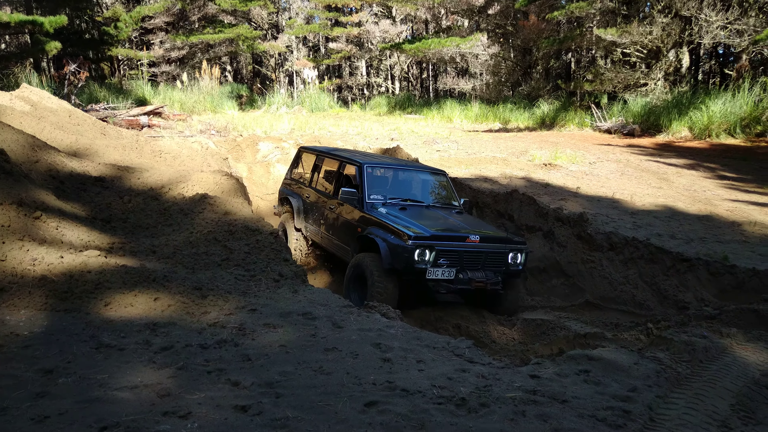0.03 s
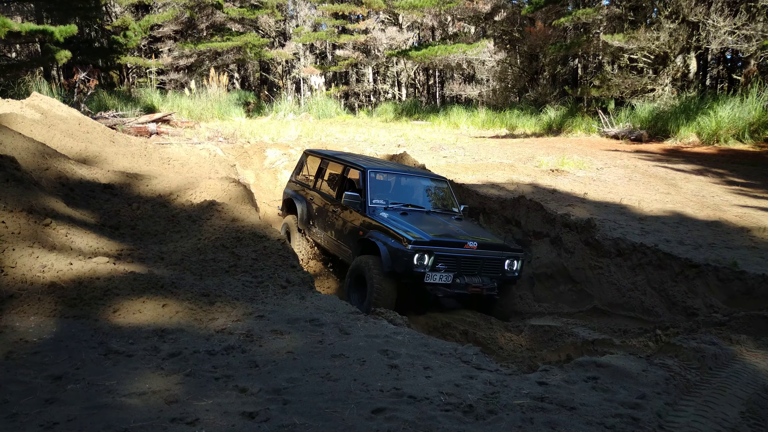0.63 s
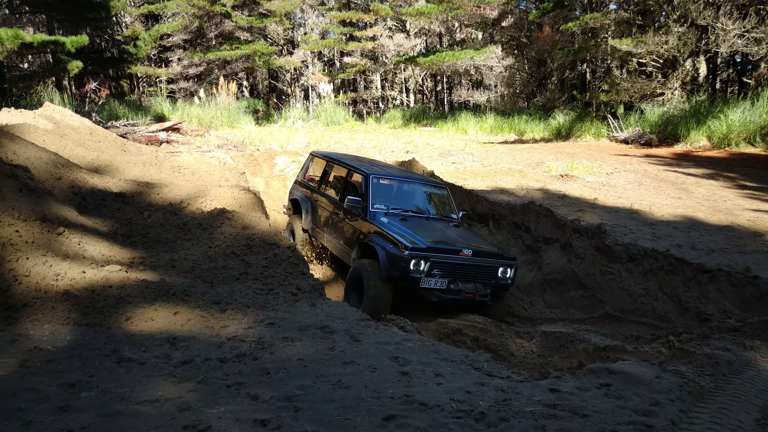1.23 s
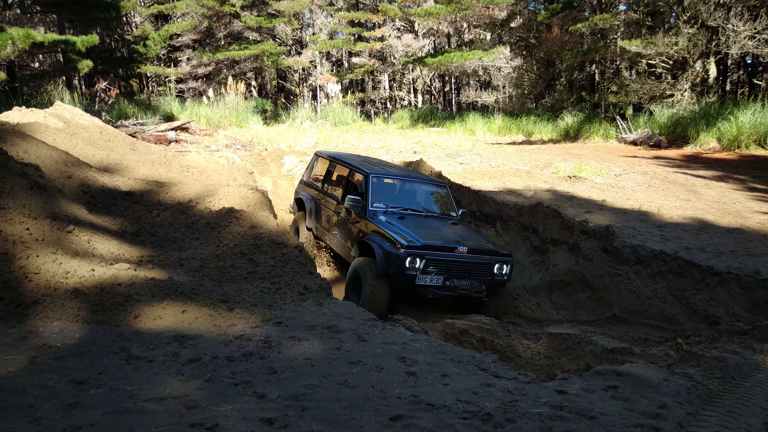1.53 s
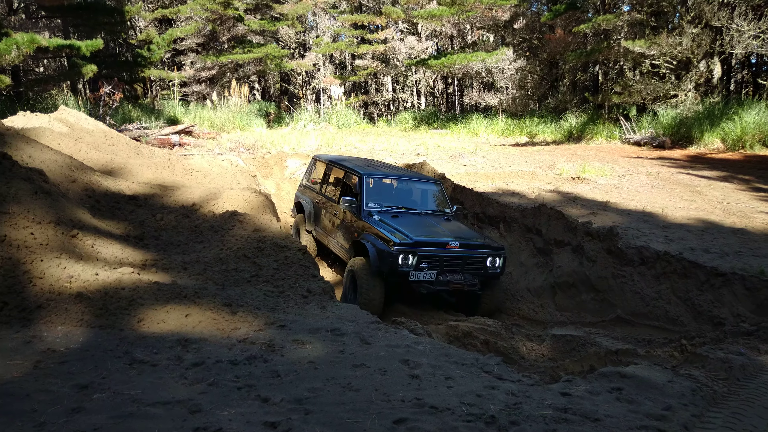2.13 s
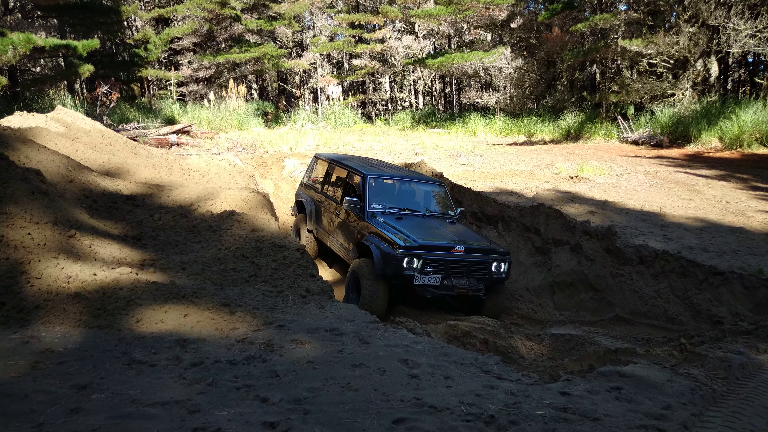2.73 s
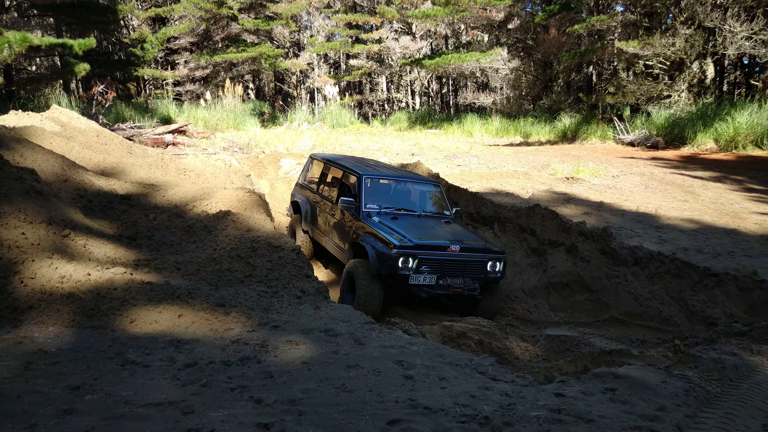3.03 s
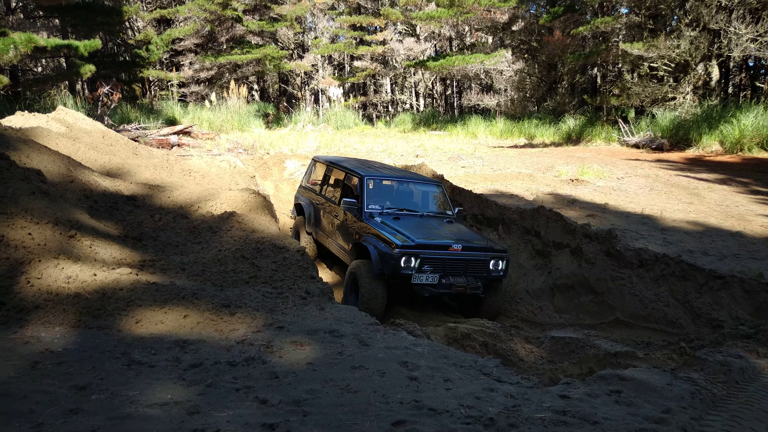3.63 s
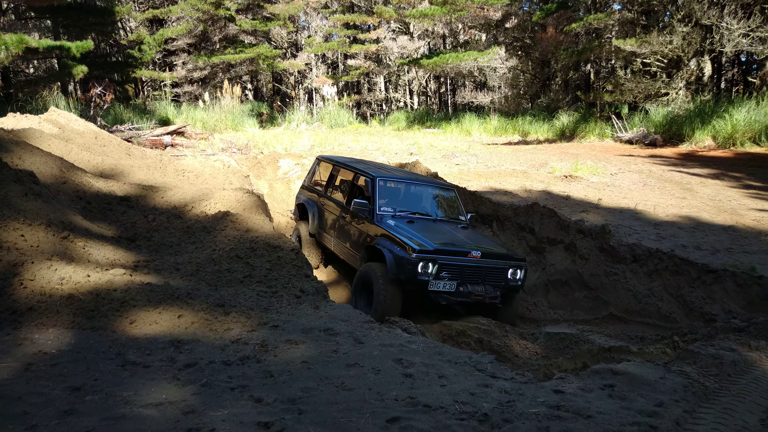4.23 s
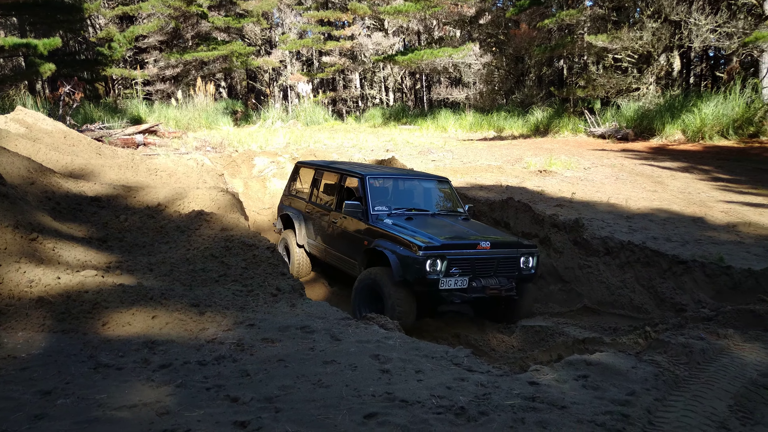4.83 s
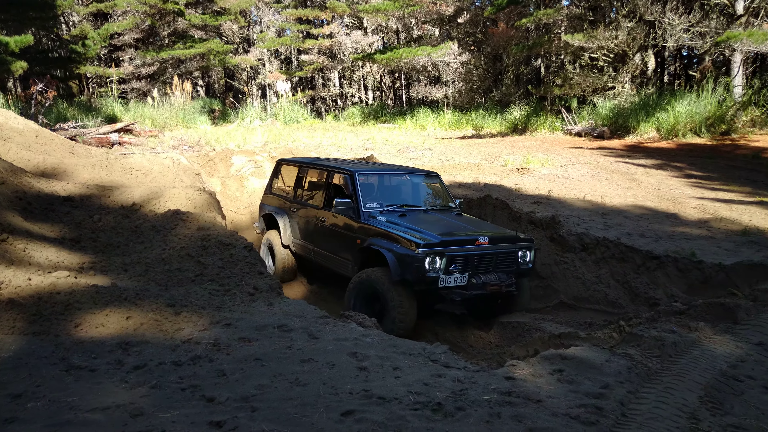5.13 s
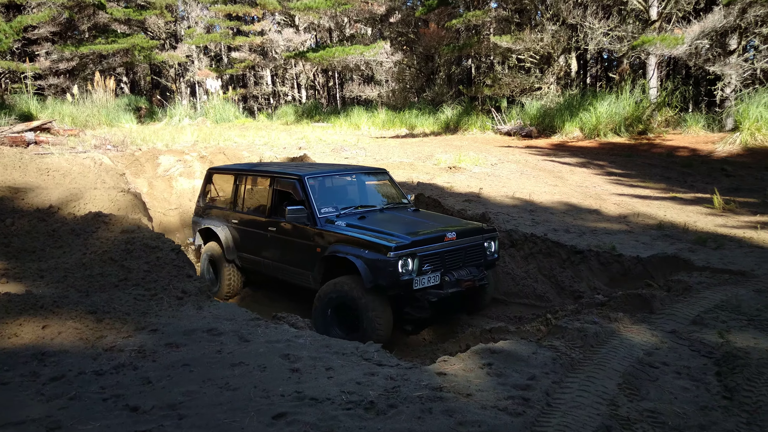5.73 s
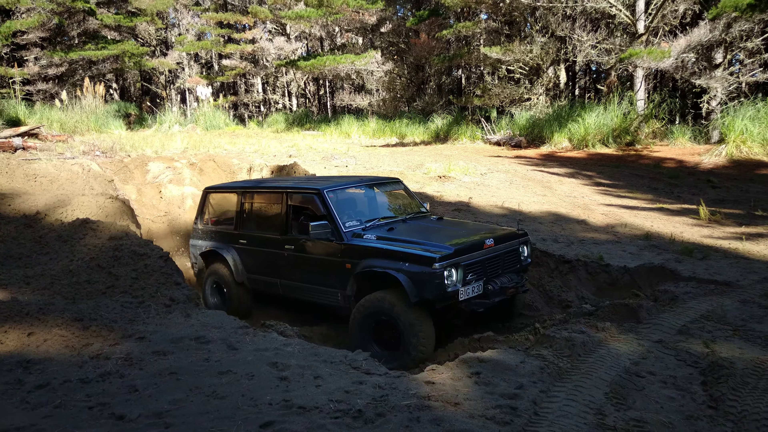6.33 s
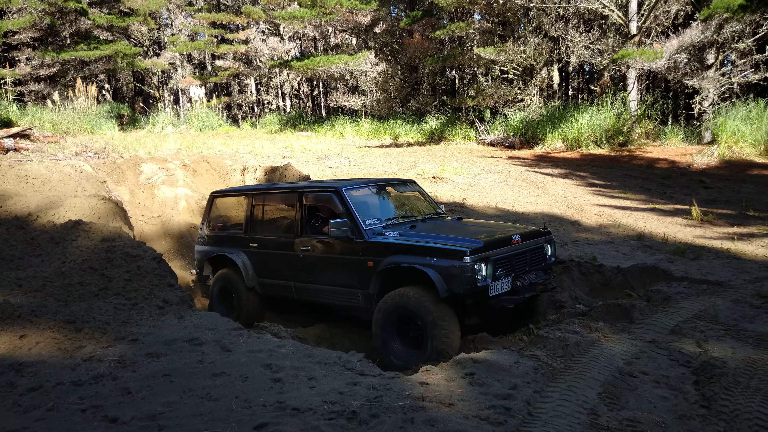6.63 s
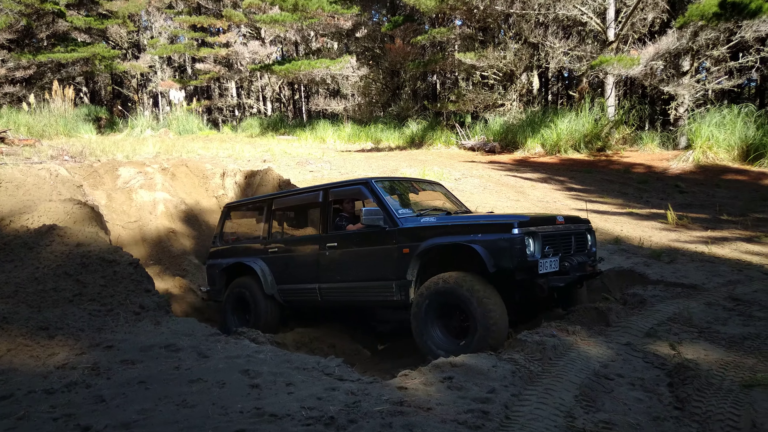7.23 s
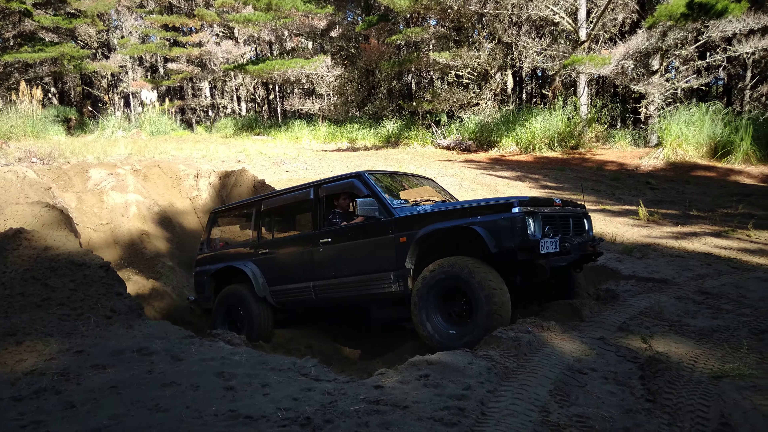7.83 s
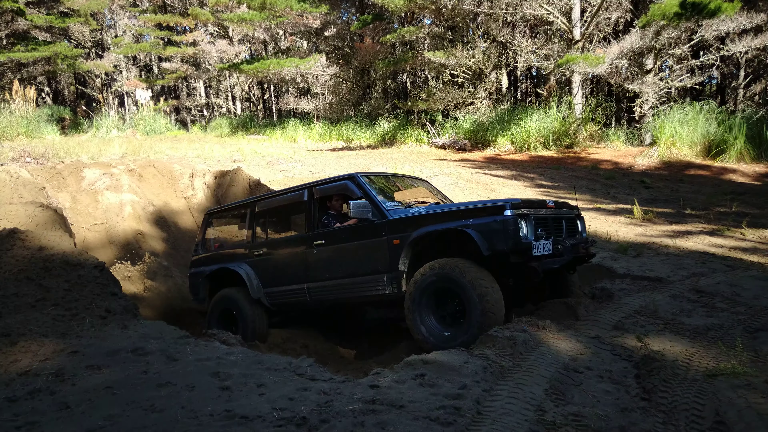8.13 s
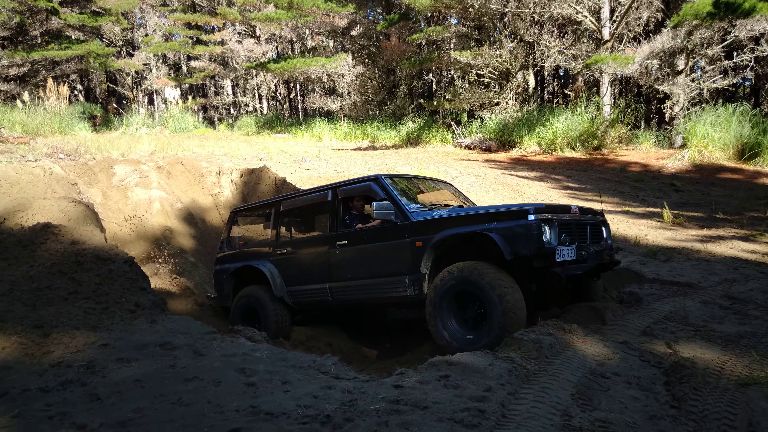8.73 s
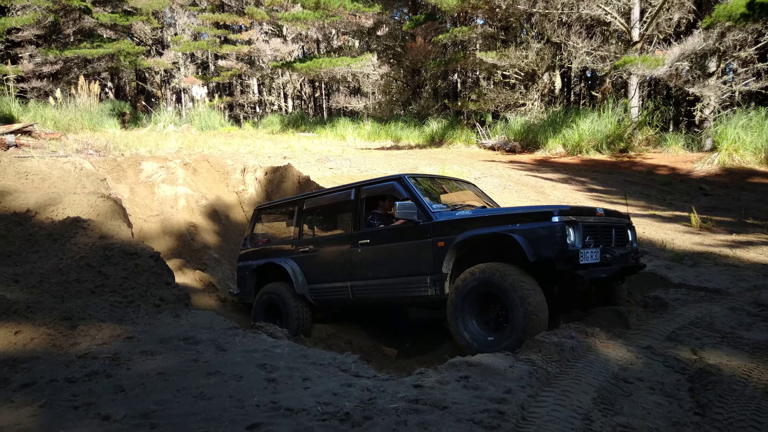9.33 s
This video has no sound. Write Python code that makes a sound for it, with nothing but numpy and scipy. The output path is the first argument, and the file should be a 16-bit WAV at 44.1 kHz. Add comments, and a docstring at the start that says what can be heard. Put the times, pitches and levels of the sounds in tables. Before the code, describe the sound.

A four-wheel drive's turbo-diesel rumbles and clatters at low revs, nearly stalling before it picks up again. It then revs hard, with a booming exhaust, a rising turbo whistle and a rasping intake howl. The throttle lifts, the chassis clanks and thumps, and the turbo flutters as it winds down. It is heard in stereo from some metres away in a forest, with faint insect hiss behind.

```python
"""A sand hollow in a pine forest; some metres from a stereo microphone a four-wheel drive crawls out.
Its six-cylinder turbo-diesel lugs and nearly stalls, then revs hard: exhaust pulses boom in the pipe,
combustion rings in the block, the turbo whistles up, the intake ducts howl and jolts knock the chassis.
Off the throttle the compressor flutters and winds down. Far off, insects hiss in the trees."""
import sys
import numpy as np
from scipy import signal
from scipy.fft import rfft, irfft, next_fast_len
from scipy.io import wavfile
from scipy.ndimage import uniform_filter1d, map_coordinates

SR = 44100
rng = np.random.default_rng(int(sys.argv[2]) if len(sys.argv) > 2 else 0)


def materialize(psi):
    """Save the field psi as 16-bit PCM at rate SR to the path in sys.argv[1].

    A 1-D psi becomes a single channel; in a 2-D psi each row is a channel.
    """
    bounded = np.clip(np.atleast_2d(psi).T, -1, 1)
    quanta = np.round(bounded * 32767).astype(np.int16)
    wavfile.write(sys.argv[1], SR, quanta)


N = 422037
TIME = np.arange(N) / SR
MIDDLE_RATE, LUG_RATE = 100, 50.4  # firings per second: mid revs, and labouring near a stall

# the foot comes off the throttle: (time [s], half-width [s], drop of the exhaust pulses [dB])
THROTTLE_LIFTS = [(2.66,.145,24),(3.14,.07,13),(7.47,.145,7.5)]
def engine(turn, rate):
    """Exhaust and block, some metres off: louder with speed, softer when the throttle lifts."""
    lift_db = swells(THROTTLE_LIFTS)
    clutch_db = 9.5 * swell(2.91, 0.5)  # with the clutch down the engine runs free and quieter
    rumble_db = -41.5 + 8.5 * np.log2(rate / MIDDLE_RATE) - 0.68 * lift_db - clutch_db
    knock_octaves = np.log2(np.maximum(rate, LUG_RATE) / MIDDLE_RATE)
    clatter_db = -35.1 + 11.5 * knock_octaves - 0.4 * lift_db - clutch_db
    angle = 2 * np.pi * turn
    tones = exhaust_boom(angle, rate, lift_db) + exhaust_bark(angle)
    tones += exhaust_growl(angle, rate, rumble_db + clutch_db / 2)
    rumble = from_db(rumble_db) * exhaust_rumble(turn, rate)
    return np.sqrt(2) * tones + rumble + block_clatter(turn, rate, clatter_db)


# exhaust pulses before the pipe colours them: (time [s], level [dB])
EXHAUST_PULSES = [(0.0, -16.5), (1.47, -19), (1.71, -8), (2.22, -8.5), (3.11, -37), (3.23, -20),
                  (3.96, -20.5), (4.59, -16.5), (5.57, -21), (5.76, -34), (6.5, -29), (6.85, -17),
                  (6.905, 0), (7.26, -0.5), (7.34, -9), (7.63, -9), (7.79, -3.5), (7.87, -11.5),
                  (8.17, -6.5), (8.32, -17.5), (8.38, -18), (9.57, -26.5)]
# pipe resonances that the firing tone and its octave pass through: (frequency [Hz], gain [dB])
PIPE_RESONANCES = [(42,-37),(58,-21),(72,-8),(83,-4.5),(105,-4.5),(125,-12),(150,-22),(180,-19.5),(240,-20),(330,-64),(430,-42)]
# the exhaust note stumbles: (time [s], half-width [s], dip [1 halves the tone], low thud [dB])
EXHAUST_STUMBLES = [(3.436,0.012,1,-27),(3.621,0.041,1,-28),(8.372,0.02,1,-21),(8.515,0.022,1,-23)]
def exhaust_boom(angle, rate, lift_db):
    """The pipe booms and wavers at the firing rate and its octave; the recorder adds a mirror tone."""
    pulse_db = in_time(EXHAUST_PULSES)[0] - lift_db
    tone_db = pulse_db + at_hz(PIPE_RESONANCES, rate)
    octave_db = pulse_db - 10.5 + at_hz(PIPE_RESONANCES, 2 * rate)
    dip = sum(depth * swell(s, width) for s, width, depth, _ in EXHAUST_STUMBLES)
    thud = sum(from_db(db) * swell(s, width) for s, width, _, db in EXHAUST_STUMBLES)
    slow, overrun = np.clip((75 - rate) / 15, 0, 1), swell(8.2, .9)
    waver_db = .7 + .3 * slow + 1.9 * overrun
    boom = (2 - dip) * from_db(tone_db + waver_db * drift(50)) * np.sin(angle)
    boom += from_db(octave_db + .7 * drift(22)) * np.sin(2 * angle + 0.12 * drift(18))
    boom += thud * np.sin(.6 * angle)
    return boom + recorder_mirror_tone(angle, rate, tone_db)


# bark at twice the firing rate as boost builds: (time [s], level [dB])
BOOST_BARK = [(5.4,-62),(5.8,-41),(6.2,-33),(6.55,-35.5),(6.68,-54),(6.85,-31.5),(7.0,-42),(7.3,-57),(7.4,-64)]
# light dabs of throttle: (time [s], half-width [s], order [x firing rate], level [dB])
THROTTLE_DABS = [(2.9,.09,2,-34.5),(3.01,.08,4,-38.5)]
def exhaust_bark(angle):
    """Under boost the pipe barks and unequal cylinders add undertones; a throttle dab sounds one order."""
    bark = from_db(in_time(BOOST_BARK)[0] + 2 * drift(25)) * np.sin(2 * angle + .3 * drift(25))
    undertones = np.sin(angle * 2 / 3) + .22 * np.sin(angle / 3)
    undertones *= from_db(in_time(BOOST_LEVEL)[0] - 19 + 2 * drift(30))
    dabs = sum(from_db(db) * swell(s, width) * np.sin(order * angle)
               for s, width, order, db in THROTTLE_DABS)
    return bark + undertones + dabs


# higher exhaust orders: (order [x firing rate], relative level [dB], share of silencer gain [0-1])
EXHAUST_ORDERS = [(1.5,-5,0.32),(2,-1.5,0.33),(2.5,-6,0.83),(3,-2,0.6),(3.5,-26.5,0.54),(4,-7,0.69),(5,-3.5,0.79)]
# response of the silencer: (frequency [Hz], gain [dB])
SILENCER_RESPONSE = [(80,13),(140,-4.5),(175,13.5),(210,-0.5),(240,5),(262,8),(295,-10),(345,-10),(410,-29.5),(620,-14),(1200,-20)]
# the engine takes up load: (time [s], half-width [s], rise [dB])
LOAD_PUSHES = [(1.05,.4,5),(3.38,.12,4),(8.15,.2,3),(5.36,.2,8),(8.65,.3,4)]
def exhaust_growl(angle, rate, base_db):
    """Higher orders sweep through the silencer's resonances and swell under load."""
    loaded_db = base_db + swells(LOAD_PUSHES)
    growl = 0
    for order, db, share in EXHAUST_ORDERS:
        level_db = loaded_db + db + share * at_hz(SILENCER_RESPONSE, order * rate) + 2.4 * drift(14)
        growl += from_db(level_db) * np.cos(order * angle + 0.25 * drift(12))
    return growl


# rough gas noise from the pipe: (frequency [Hz], level [dB])
PIPE_SPECTRUM = [(30,-42),(60,-31),(110,-15),(165,0),(210,-1.5),(260,0),(335,-3),(410,-18),(600,-19.5),(1200,-40.5)]
# the engine shaking on its mounts: (frequency [Hz], level [dB])
SHUDDER_SPECTRUM = [(20,-9),(45,-8),(90,1),(150,-2),(260,-26),(600,-67)]
def exhaust_rumble(turn, rate):
    """Uneven firings and noise rumble in the pipe; a slow engine shudders on its mounts."""
    rough = from_db(-1.5) * firings(turn, rate, ring_s=0.025, uneven_db=2.5) + from_db(3) * white()
    shake = from_db(2.5) * (60 / np.maximum(rate, LUG_RATE)) ** 2.7
    return radiate(rough, PIPE_SPECTRUM) + shake * radiate(white(), SHUDDER_SPECTRUM)


# ring of the engine block: (frequency [Hz], level [dB])
BLOCK_SPECTRUM = [(200,-35.5),(410,-12),(550,2.5),(800,6.5),(1000,-4),(1150,-9),(1500,-3.5),(1830,-12.5),(2200,-3),(2600,-18.5),(4000,-23),(6300,-16.5),(8500,-65),(15000,-49)]
# the labouring engine knocks harder: (time [s], half-width [s], rise [dB])
HARD_KNOCKS = [(.2,0.38,1),(1.9,0.026,6),(2.02,.015,3),(2.125,0.01,8),(2.235,0.021,6.5),(5.2,.45,2)]
def block_clatter(turn, rate, level_db):
    """Combustion knock and a noise that throbs with it ring in the engine block."""
    knock_share = np.clip(0.23 * rate / 150, 0, .8)
    knock = firings(turn, rate, ring_s=0.011, uneven_db=2.0)
    throb = rms_one(from_db(0.33 * np.cos(2 * np.pi * turn) + 0.85 * drift(30)))
    force = np.sqrt(knock_share) * knock + np.sqrt(1 - knock_share) * throb * white()
    block = radiate(force, BLOCK_SPECTRUM)
    # fast combustion hardens the knock, so the block's low ring recedes
    hardness = np.clip(0.43 * np.log2(rate / 91), 0, .7)
    block -= hardness * resonate(block, hz=630, width_hz=420)
    return from_db(level_db + swells(HARD_KNOCKS)) * block


# loudness of the intake as boost builds and drops: (time [s], level [dB])
BOOST_LEVEL = [(5.6,-90),(6.3,-45),(6.62,-29),(6.76,-20.5),(6.88,-13.8),(7.07,-13.5),(7.17,-15.5),(7.285,-14.5),(7.335,-40),(8.1,-53),(8.8,-100)]
# intake duct resonances: (frequency [Hz], nominal width [Hz], gain [dB])
INTAKE_DUCTS = [(560,110,-15),(745,140,-3),(890,140,-4),(1100,80,-10),(1410,60,-3),(1555,100,0),(2085,60,-7),(2265,70,4),(2340,60,-3),(2420,70,-1.5),(2780,50,-8),(2990,130,-11)]
def intake_howl(turn, rate):
    """Under boost the gulps of the cylinders ring in the intake ducts, each duct swelling on its own."""
    gulps = firings(turn, rate, ring_s=.005, uneven_db=1.7) + .15 * white()
    ducts = 0
    for hz, width, db in INTAKE_DUCTS:
        ring = resonate(resonate(gulps, hz, 2 * width), hz, 2 * width)
        ducts += from_db(db + 1.6 * drift(7)) * ring
    mid, side = rms_one(ducts)
    howl = mid + 0.3 * side * np.array([[1], [-1]])
    return from_db(in_time(BOOST_LEVEL)[0] - 5.5) * howl


# rasp of the intake: (frequency [Hz], level [dB])
RASP_SPECTRUM = [(100,-30),(400,10),(900,-10),(1600,-12),(2500,-2),(3000,0.5),(3500,13.5),(4150,1),(5000,11),(5800,12.5),(8500,2),(11000,-2),(15500,-1)]
# hiss of the charge air: (frequency [Hz], level [dB])
HISS_SPECTRUM = [(2500,-27),(4000,-21),(4600,1),(5900,6),(7300,0.5),(8500,-4.5),(10000,-8.5),(12000,-11.5),(14000,-3),(16000,-10)]
def intake_rush(turn, rate):
    """Near full boost each firing spits a sharp rasp and the charge air hisses in spurts."""
    boost_db, = in_time(BOOST_LEVEL)
    spits = firings(turn, rate, ring_s=0.004, uneven_db=2.0) * from_db(1.3 * drift(90))
    spurts = rms_one(from_db(1.2 * drift(40) + 3 * np.cos(2 * np.pi * turn)))
    rasp = from_db(-11) * radiate(spits, RASP_SPECTRUM)
    hiss = from_db(-13) * spurts * radiate(white(), HISS_SPECTRUM)
    rush_db = boost_db + .5 * (boost_db - boost_db.max())  # grows faster than the howl
    return from_db(rush_db) * (rasp + hiss)


# air through the compressor: (frequency [Hz], level [dB])
AIR_SPECTRUM = [(400,-54),(900,7.5),(1500,15),(2300,7),(3000,8),(4000,-4),(5200,8.5),(6800,14.5),(8500,1.5),(11500,-14),(14000,1),(16000,-11.5)]
# the flow swells and sags with the throttle: (time [s], half-width [s], change [dB])
AIR_GUSTS = [(6.6,0.11,-2),(7.4,0.11,-2),(7.675,0.022,2.5),(7.77,0.017,2),(7.88,.07,-1.5),(8.15,0.15,0.5),(9.3,0.18,-1)]
def compressor_air(turn, rate, turbo_hz, surge_db):
    """Air rushes through the compressor, louder with the revs, louder and brighter with turbo speed."""
    no_flow_hz, full_flow_hz = 2525, 11500  # whistle pitches between which the rush brightens
    grit = rms_one(from_db(0.91 * drift(56) + 0.72 * np.cos(2 * np.pi * turn)))
    bright = radiate(grit * white(), AIR_SPECTRUM)
    dull = signal.sosfilt(signal.butter(2, 7000, fs=SR, output="sos"), bright)
    flow = np.clip(np.log(turbo_hz / no_flow_hz) / np.log(full_flow_hz / no_flow_hz), 1e-6, 1) ** 0.38
    speed_db = -40.5 + 10 * np.log2(rate / MIDDLE_RATE) + 3 * np.log2(turbo_hz / 4000)
    approach_db = np.interp(TIME, [5.5, 8.5], [0, 2.5])  # the vehicle nears the microphone
    level_db = speed_db + approach_db + surge_db + swells(AIR_GUSTS)
    return from_db(level_db) * (flow * bright + (1 - flow) * dull)


def compressor_surge():
    """Off the throttle the compressor surges in a quickening run of chuffs; gives the swing in dB."""
    start_s, first_gap_s, quicken_s = 8.102, .0675, .0012
    chuff = np.arange(20)
    times = start_s + chuff * first_gap_s - chuff ** 2 * quicken_s / 2
    surge_db = 6 * sum(swell(s, 0.017) for s in times)
    return surge_db - uniform_filter1d(surge_db, size=SR // 8)


# the turbo's whistle: (time [s], level [dB])
WHISTLE_LEVEL = [(5.2,-85),(5.7,-61),(5.98,-51),(6.05,-33),(6.1,-39),(6.2,-32),(6.36,-27.5),(6.47,-39),(6.57,-39),(6.64,-32),(6.71,-38),(6.9,-37),(7.0,-47),(7.25,-45),(7.33,-53),(7.5,-49),(7.59,-38),(7.76,-47),(7.95,-37),(8.12,-29.5),(8.4,-45),(8.7,-54),(8.85,-68),(9.57,-80)]
# its octave, heard while the compressor takes up load: (time [s], level [dB])
WHISTLE_OCTAVE = [(4.2,-85),(4.55,-58),(5.3,-58),(5.55,-68),(5.95,-53),(6.42,-46),(6.5,-110)]
def turbo_whistle(hz, surge_db):
    """A breathy tone reaches each microphone side by shifting paths; chuffs shake pitch and level."""
    whistle_db = in_time(WHISTLE_LEVEL)[0] + .25 * surge_db
    bend = 1 + 0.0045 * drift(35) + .001 * surge_db
    angle = 2 * np.pi * np.cumsum(hz * bend) / SR
    octave = from_db(in_time(WHISTLE_OCTAVE)[0]) * np.sin(2 * angle)
    channels, shared_flicker = [], drift(25)
    for side in (1, -1):
        breath = drift(150) * np.sin(angle) + drift(150) * np.cos(angle)
        tone = rms_one(np.sin(angle + .6 * drift(30)) + .5 * breath)
        flicker_db = 2.24 * (shared_flicker + drift(50))
        level_db = whistle_db + side * at_hz(MIC_BALANCE, hz) / 2 + flicker_db
        channels.append(from_db(level_db) * tone + octave * (.7 + .5 * drift(60)))
    return np.array(channels)


# jolts of the suspension: (time [s], clank level [dB], low thump level [dB])
SUSPENSION_JOLTS = [(7.272,-17,-14),(7.312,-21,-25),(7.395,-44,-22),(7.665,-13,-19),(7.705,-18,-15),(7.752,-22,-17),(7.812,-29,-26),(7.993,-16,-14),(8.010,-14.5,-19),(8.076,-21.5,-20),(8.160,-21,-20),(8.186,-25,-28),(8.232,-22,-24),(8.303,-23,-23),(8.390,-27,-17),(8.432,-26,-30),(8.52,-28,-32)]
# modes of the chassis: (frequency [Hz], level [dB], time to fall 60 dB [s])
CHASSIS_MODES = [(98,-21,0.096),(152.6,-0.5,0.12),(288,-3,0.073),(342,-12,0.096),(517,-4.5,0.048),(573,-1.5,0.089),(671,-7,0.17),(830,-10,0.046),(974,-13,0.059),(1360,-18,0.3)]
def chassis_knocks():
    """Each jolt thumps the low chassis modes, clanks the high ones and scatters a short crunch."""
    clanks = [(s, db) for s, db, _ in SUSPENSION_JOLTS]
    thumps = [(s, db) for s, _, db in SUSPENSION_JOLTS]
    body = sum((-1) ** k * from_db(db) * struck(thumps if hz < 400 else clanks, hz, t60)
               for k, (hz, db, t60) in enumerate(CHASSIS_MODES))
    body = signal.sosfilt(signal.butter(2, 85, "high", fs=SR, output="sos"), body)
    crunch = radiate(bursts(clanks, t60=.09) * white(), BLOCK_SPECTRUM)
    return body + from_db(-9.5) * crunch


# sharp ticks from under the vehicle: (time [s], level [dB])
UNDERBODY_TICKS = [(.3595,-33),(.3635,-22.5),(1.699,-47)]
# modes of the part that ticks: (frequency [Hz], level [dB], time to fall 60 dB [s])
SMALL_PART_MODES = [(646,-4.5,.17),(824,-10,.08),(1384,-14.5,.09),(1523,-15.5,.1),(2200,-14.5,.19)]
# the click of each tick: (frequency [Hz], level [dB])
CLICK_SPECTRUM = [(100,-12),(300,-5),(680,6),(1200,-1),(1800,-6),(2350,0),(2800,-6),(3300,-1),(4100,-3),(4800,0),(6500,3),(7500,-3),(9000,-17),(15000,-30)]
def underbody_ticks():
    """A small part under the vehicle clicks and rings briefly."""
    ring = sum(from_db(db) * struck(UNDERBODY_TICKS, hz, t60) for hz, db, t60 in SMALL_PART_MODES)
    return ring + radiate(bursts(UNDERBODY_TICKS, t60=0.028) * white(), CLICK_SPECTRUM)


# the pine forest around the microphone: (frequency [Hz], level [dB])
FOREST_SPECTRUM = [(30,6.5),(130,12.5),(260,11.5),(410,-23),(560,9.5),(750,11),(1100,-49),(2100,4.5),(2700,-68),(4000,-38),(5200,-19),(6400,-1),(8500,-35),(15000,-22)]
def forest():
    """Far insects hiss in the trees over a steady low murmur."""
    return from_db(-47.0) * radiate(white(), FOREST_SPECTRUM)


def recorder_mirror_tone(angle, rate, tone_db):
    """At low revs a faint, very deep tone from the recorder mirrors the firing tone about 50 Hz."""
    low_revs = np.clip((100 - rate) / 25, 0, 1)
    return from_db(tone_db - 19) * low_revs * np.sin(2 * np.pi * 100 * TIME - angle)


# likeness of the microphone's two sides: (frequency [Hz], correlation [0-1])
MIC_LIKENESS = [(100,.999),(300,.98),(700,.93),(1300,.78),(2400,.78),(4500,.55),(8000,.45),(14000,.25)]
# balance at the microphone: (frequency [Hz], left minus right [dB])
MIC_BALANCE = [(100,.5),(350,-0.5),(700,-0.5),(1300,6.5),(2400,0.5),(5000,4),(9000,-3.5),(14000,4)]
def radiate(pair, spectrum):
    """Colour two unrelated signals by a spectrum's shape and spread them to left and right."""
    size = next_fast_len(N + SR // 10)
    hz = np.arange(size // 2 + 1) * SR / size
    mid, side = rfft(pair, size) * rms_one(from_db(at_hz(spectrum, hz)))
    alike, sign = at_hz(MIC_LIKENESS, hz), np.array([[1], [-1]])
    both = np.sqrt((1 + alike) / 2) * mid + sign * np.sqrt((1 - alike) / 2) * side
    return irfft(both * from_db(sign * at_hz(MIC_BALANCE, hz) / 2), size)[:, :N]


def firings(turn, rate, ring_s, uneven_db, cylinders=6):
    """Each cylinder strikes the structure by its own path, so the pattern repeats every engine cycle."""
    onsets = np.flatnonzero(np.diff(np.floor(turn)) > 0)
    force = from_db(uneven_db * rng.standard_normal(len(onsets))) / np.sqrt(rate[onsets])
    age, ringing = TIME[:SR // 20], 0
    for k in range(cylinders):
        blows = np.zeros((1, N))
        blows[0, onsets[k::cylinders]] = force[k::cylinders]
        path = rng.standard_normal((2, len(age))) * np.exp(-age / ring_s)
        ringing += signal.oaconvolve(blows, path, axes=1)[:, :N]
    return rms_one(ringing)


def struck(blows, hz, t60, rattle=0.012):
    """One mode rung by blows of slightly varying strength, each trailing a short rattle."""
    force = bursts(blows, t60=.06) * rattle * rng.standard_normal(N)
    for s, db in blows:
        force[int(s * SR)] += from_db(db + rng.standard_normal())
    decay, step = from_db(-60 / (t60 * SR)), 2 * np.pi * hz / SR
    return signal.lfilter([0, np.sin(step)], [1, -2 * decay * np.cos(step), decay ** 2], force)


def resonate(x, hz, width_hz):
    """A resonance with unit gain at its peak."""
    r = np.exp(-np.pi * width_hz / SR)
    poles = [1, -2 * r * np.cos(2 * np.pi * hz / SR), r * r]
    return signal.lfilter(np.array([1, 0, -1]) * (1 - r * r) / 2, poles, x + 1e-18)


def bursts(rows, t60):
    """Envelope of sudden onsets that die away."""
    hits = np.zeros(N)
    for s, db in rows:
        hits[int(s * SR)] += from_db(db)
    return signal.lfilter([1], [1, -from_db(-60 / (t60 * SR))], hits + 1e-18)


def swell(s, half_width):
    """A smooth bump around one moment."""
    return np.exp(-np.minimum(((TIME - s) / half_width) ** 2, 20))


def swells(rows):
    """A sum of smooth bumps."""
    return sum(height * swell(s, half_width) for s, half_width, height in rows)


def drift(hz):
    """Random wander with spread 1, mostly slower than hz."""
    hop, settle = 40, 2000
    r = np.exp(-2 * np.pi * hz * hop / SR)
    noise = rng.standard_normal(N // hop + settle + 2)
    slow = signal.lfilter([1], [1, -2 * r, r * r], noise)[settle:]
    return np.interp(np.arange(N) / hop, np.arange(len(slow)), rms_one(slow))


def white():
    """Two unrelated noises."""
    return rng.standard_normal((2, N))


def from_db(db):
    """Decibels to gain."""
    return 10 ** (np.asarray(db) / 20)


def rms_one(x):
    """Scale to unit rms."""
    return x / np.sqrt(np.mean(x ** 2) + 1e-20)


def in_time(rows):
    """One curve per value column of a time table."""
    s, *columns = np.transpose(rows)
    return [np.interp(TIME, s, column) for column in columns]


def at_hz(points, hz):
    """Read a spectrum on a log-frequency axis."""
    frequency, value = np.transpose(points)
    return np.interp(np.log(np.maximum(hz, 1)), np.log(frequency), value)


# engine speed: (time [s], firing rate [Hz])
FIRING_RATE = [(0.0, 73.0), (0.36, 72.1), (0.68, 59.8), (0.98, 57.4), (1.35, 62.4), (1.81, 42.6),
               (2.17, 43.5), (2.41, 57.5), (2.8, 52.2), (2.9, 56.5), (3.03, 59.0), (3.17, 58.2), (3.33, 81),
               (3.45, 86), (3.58, 107), (3.72, 97), (3.96, 63.8), (4.6, 84.3), (5.04, 78.5), (5.24, 85.0),
               (5.5, 89.5), (5.8, 107.0), (6.17, 136.0), (6.98, 230.3), (7.27, 245.9), (7.44, 211.1),
               (7.68, 214.0), (7.83, 186.9), (8.11, 166.3), (8.45, 120.3), (9.19, 79.0), (9.57, 67.2)]
# turbo shaft speed: (time [s], whistle pitch [Hz])
TURBO_PITCH = [(4.3,2560),(5.0,2640),(5.35,2825),(5.7,3400),(5.95,4300),(6.02,4700),(6.2,5650),(6.35,6700),(6.55,8450),(6.73,10330),(6.85,10960),(6.95,11180),(7.27,11330),(7.39,9250),(7.56,9230),(7.69,9750),(7.76,9250),(7.84,8050),(7.94,7580),(8.05,7310),(8.2,6400),(8.35,5660),(8.45,5170),(8.6,4610),(8.8,3950),(9.57,3000)]
# the vehicle lies a little left of the microphone, more so at the end: (time [s], right lag [ms])
RIGHT_LAG = [(0,0.055),(5.6,0.028),(6.8,0.087),(9.57,.11)]
def scene():
    """The vehicle some metres from the microphone, with the quiet forest behind it."""
    rate, turbo_hz, lag_ms = in_time(FIRING_RATE) + in_time(TURBO_PITCH) + in_time(RIGHT_LAG)
    turn = np.cumsum(rate) / SR  # advances by one per firing
    surge_db = compressor_surge()
    vehicle = engine(turn, rate) + intake_howl(turn, rate) + intake_rush(turn, rate)
    vehicle += compressor_air(turn, rate, turbo_hz, surge_db) + turbo_whistle(turbo_hz, surge_db)
    left, right = vehicle + chassis_knocks() + underbody_ticks()
    right = map_coordinates(right, [np.arange(N) - lag_ms * SR / 1000], order=3)
    return np.array([from_db(0.35) * left, right]) + forest()


def record(dry):
    """Only the tallest peaks are rounded; the top treble is cut steeply."""
    ceiling, cutoff_hz = .88, 15650
    rounded = dry / (1 + (dry / ceiling) ** 6) ** (1 / 6)
    return signal.sosfilt(signal.ellip(12, .1, 90, cutoff_hz, fs=SR, output="sos"), rounded)


dry = scene()
out = record(dry)
materialize(out)
```